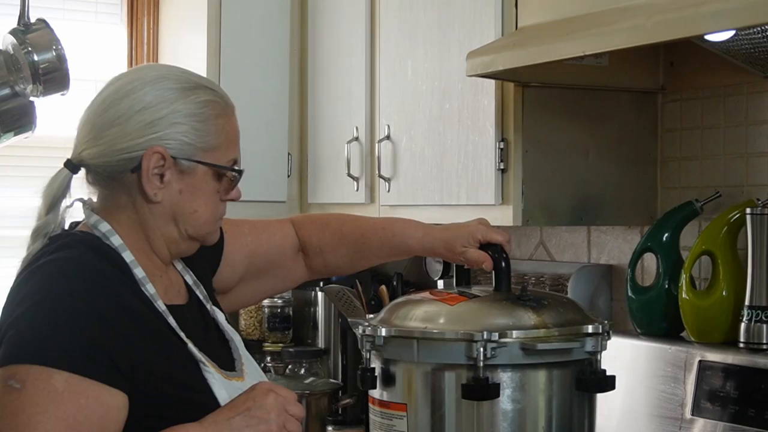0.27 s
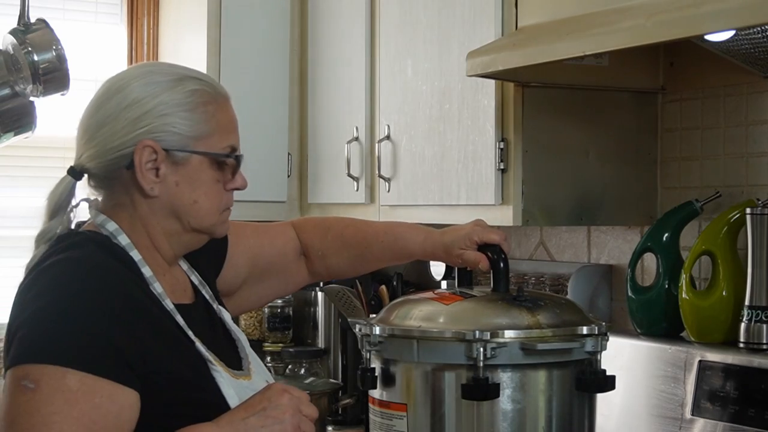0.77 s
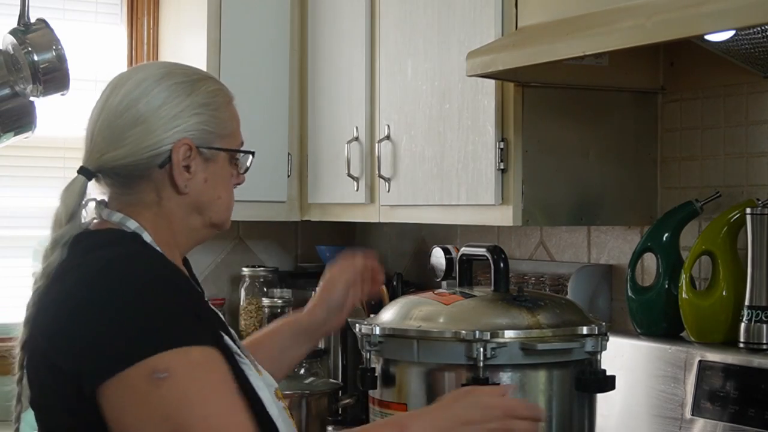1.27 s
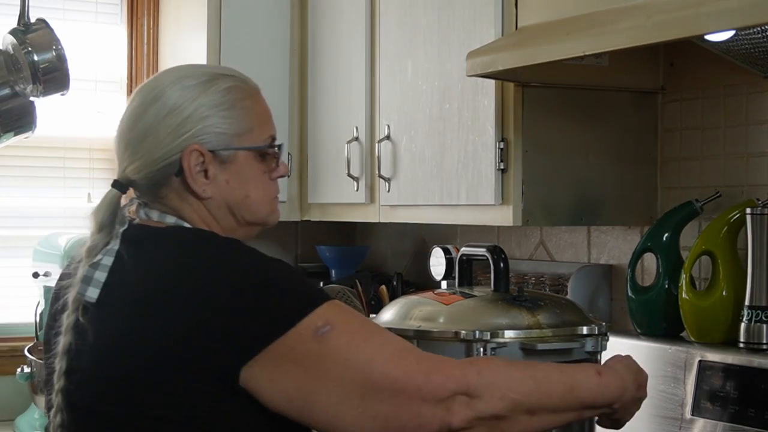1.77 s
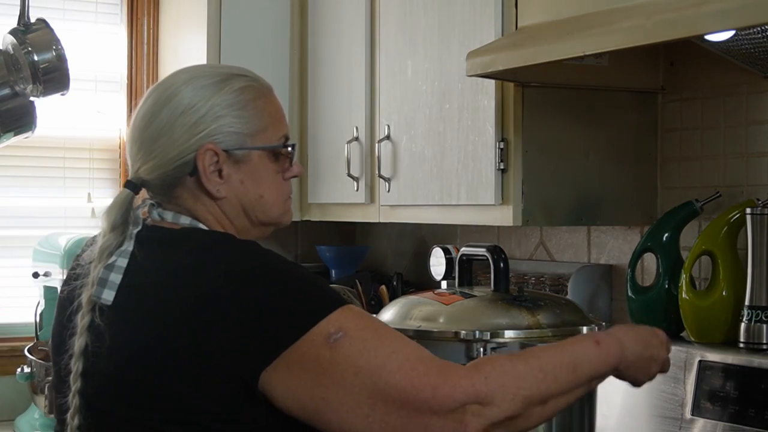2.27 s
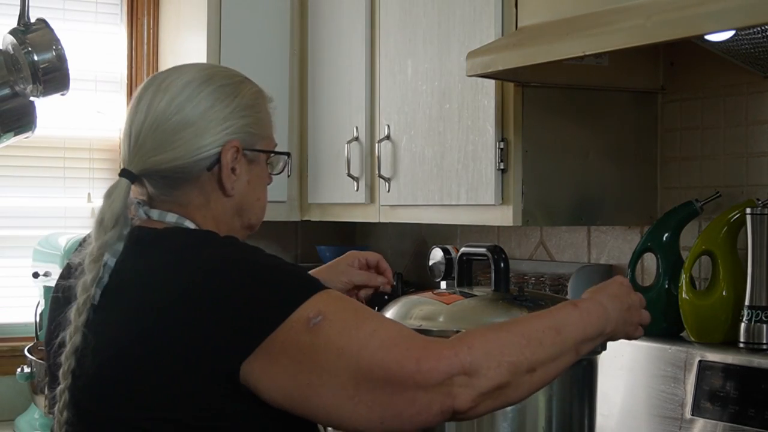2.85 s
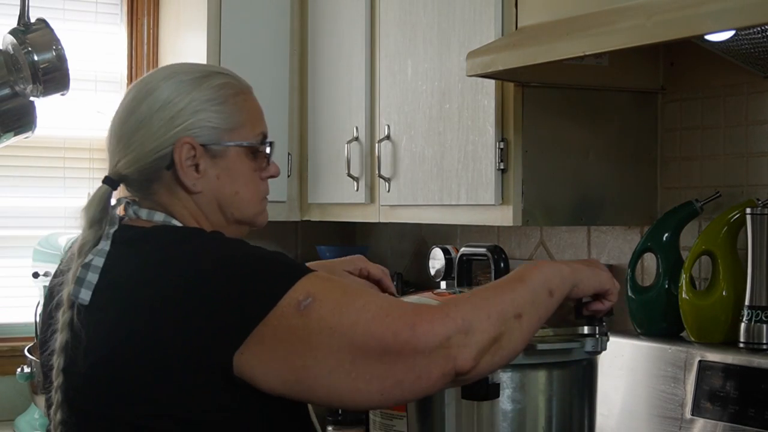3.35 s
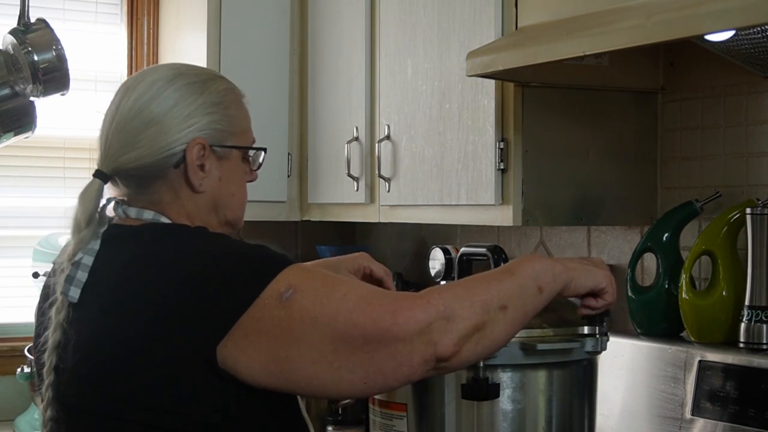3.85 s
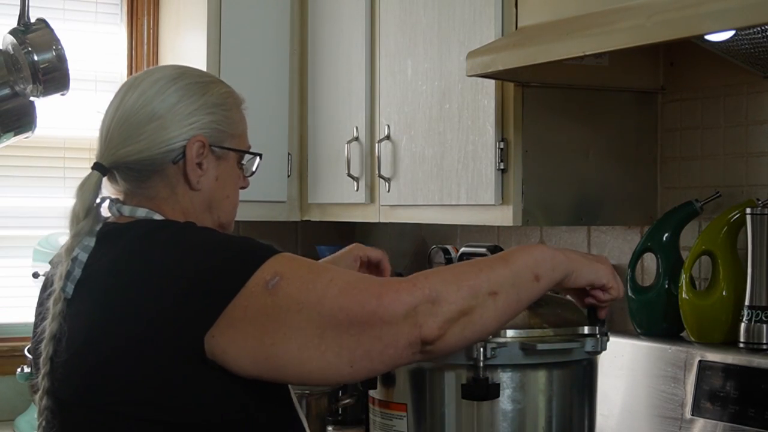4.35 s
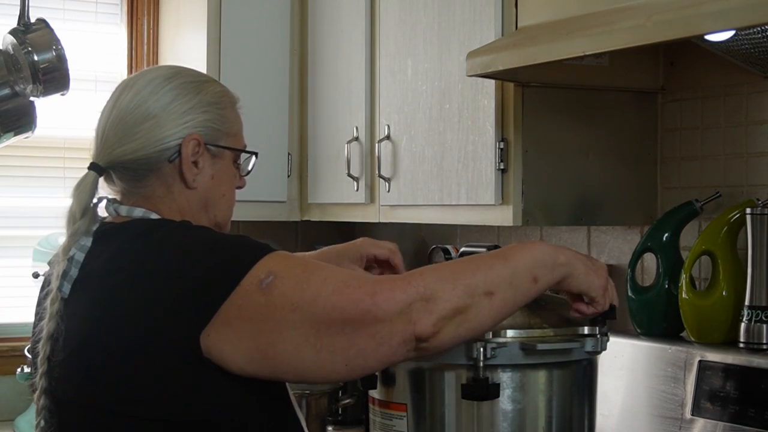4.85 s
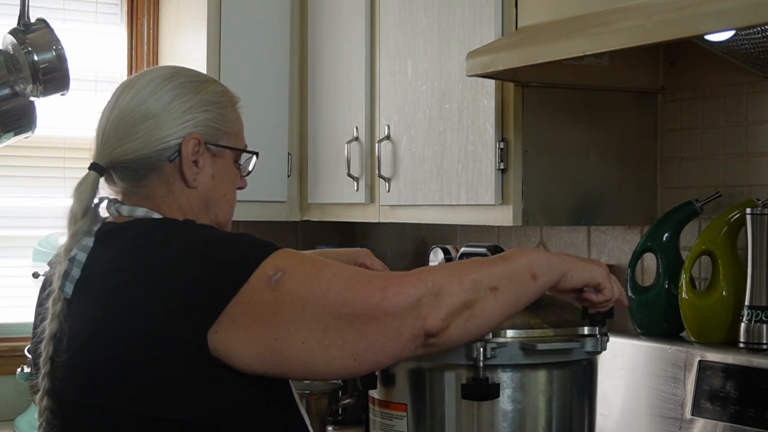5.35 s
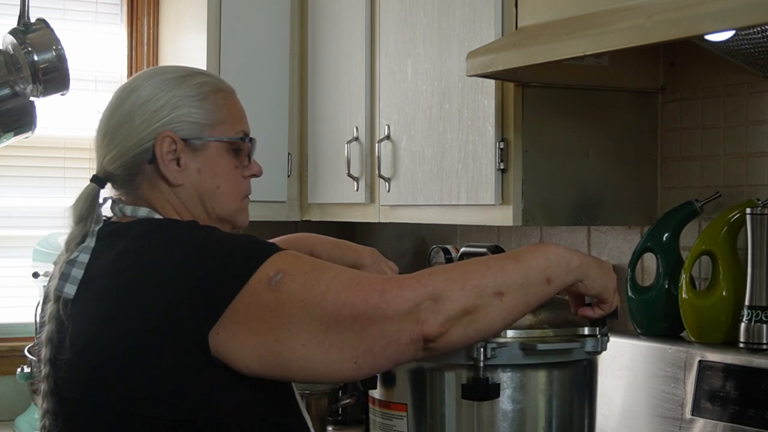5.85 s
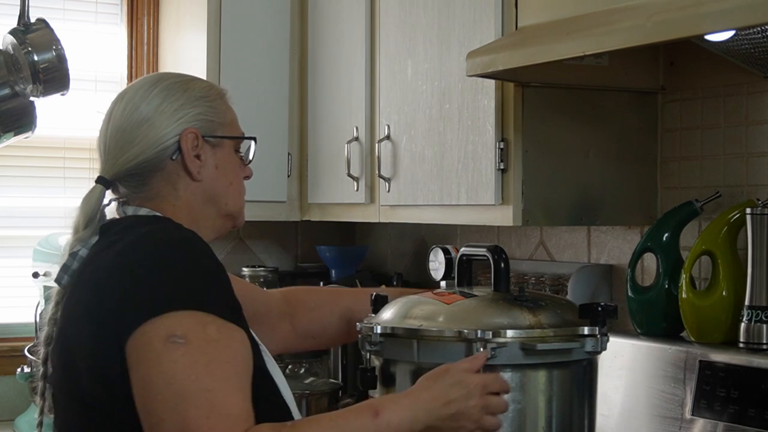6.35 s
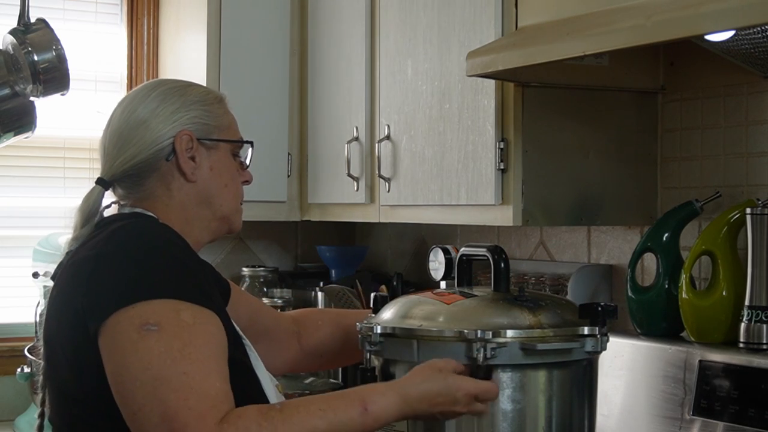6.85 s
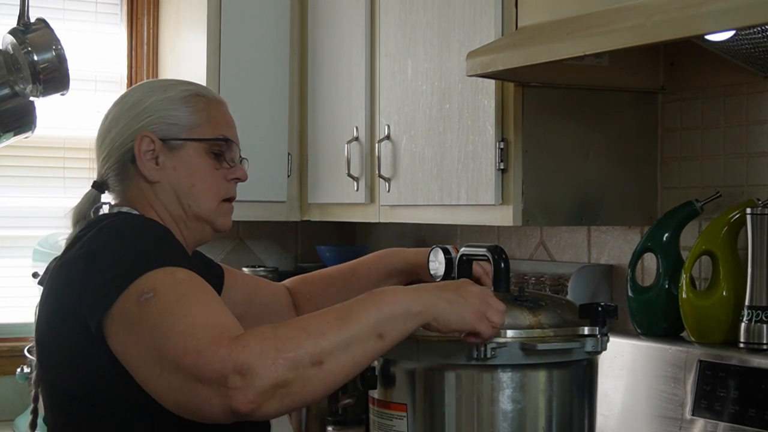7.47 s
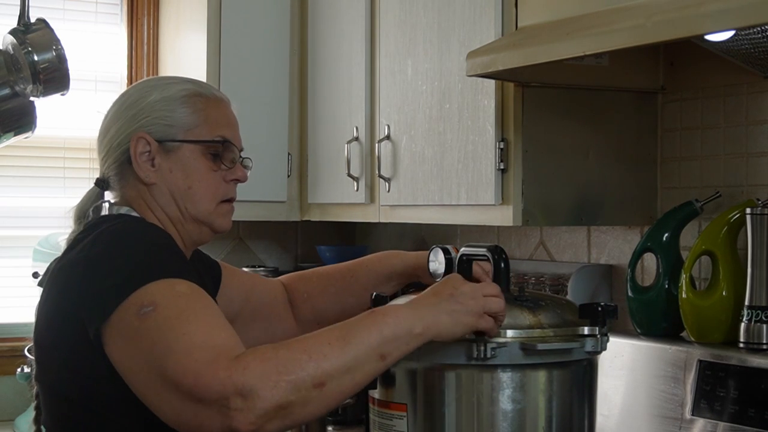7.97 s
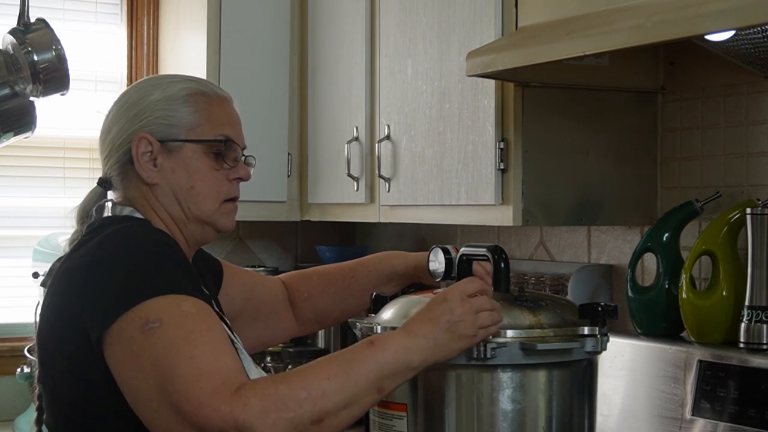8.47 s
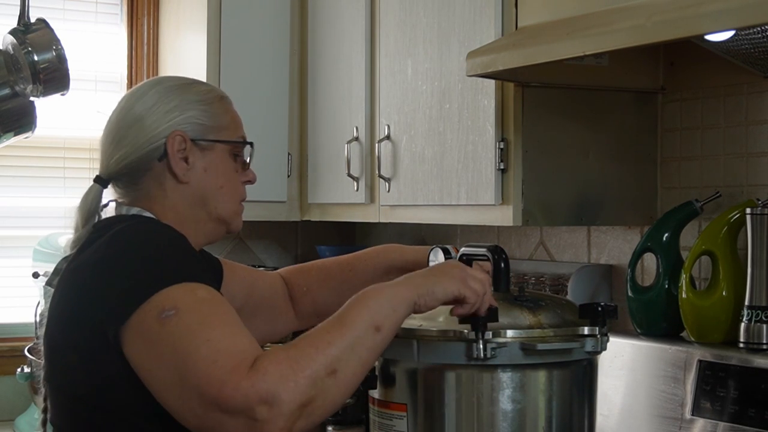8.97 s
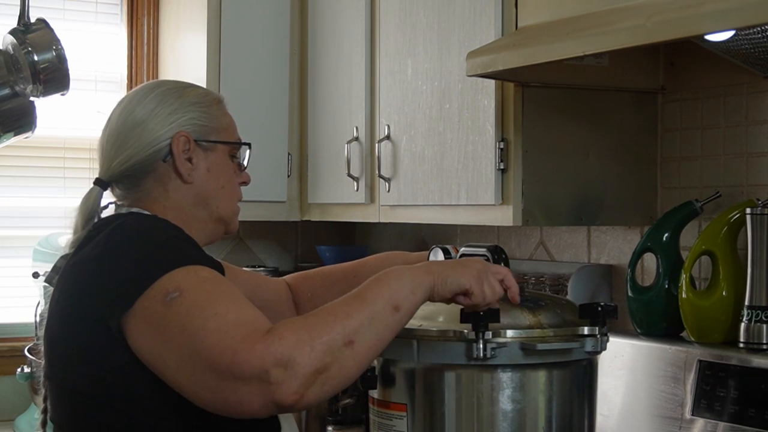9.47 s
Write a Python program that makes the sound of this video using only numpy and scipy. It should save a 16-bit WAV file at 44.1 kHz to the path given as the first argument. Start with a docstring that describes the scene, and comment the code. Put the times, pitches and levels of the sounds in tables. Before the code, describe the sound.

In a small bright kitchen with a low, slowly pulsing hum and soft fan rush, a heavy aluminium lid rubs with a brief singing tone and knocks into place on a large pot. After a pause, clamp bolts rattle and clink, one striking loudly against the rim, then taper off. Another gap, then hard plastic knobs clack and tick irregularly. Close microphone, short room reflections.

```python
"""Throughout, a soft fan rush and two motor hums that beat once a second lie under a small bright kitchen.
First a heavy aluminium lid rubs on a large pressure pot, two modes singing, and knocks into place.
Clamp bolts then swing up against its rim: noisy contacts that also ring the seated lid's modes.
Last, hard plastic knobs clack and click as they are turned: sharp cracks over short, damped modes."""
import sys
import numpy as np
from scipy.fft import rfft, irfft, next_fast_len
from scipy.io import wavfile
from scipy.ndimage import uniform_filter1d

SR = 44100
rng = np.random.default_rng(int(sys.argv[2]) if len(sys.argv) > 2 else 0)


def persist_wave(psi):
    """Save psi, clipped to +-1, as 16-bit WAV."""
    counts = np.round(np.clip(psi, -1, 1) * 32767).astype(np.int16)
    wavfile.write(sys.argv[1], SR, np.atleast_2d(counts).T)


N = 428652
HIT = 2 ** 15  # samples per blow
T = np.arange(HIT) / SR
HZ = np.fft.rfftfreq(HIT, 1 / SR)


def amp(db):
    """Decibels to gain."""
    return 10 ** (np.asarray(db) / 20)


def unit(x):
    """Scale to rms 1."""
    return x / np.sqrt(np.mean(x ** 2) + 1e-20)


def along(points, hz):
    """Interpolate (Hz, value) points on a log frequency axis."""
    f, v = np.transpose(points)
    return np.interp(np.log(hz + 1), np.log(f + 1), v)


def bumps(peaks, hz):
    """Summed lift in dB of broad resonances (Hz, width Hz, lift dB)."""
    return sum(db / (1 + (2 * (hz - centre) / width) ** 2) for centre, width, db in peaks)


def fade(t60_s):
    """Exponential decay over one hit: 60 dB in t60_s."""
    return np.exp(-np.log(1000) * T / t60_s)


def wander(size, step):
    """Random curve, straight between normal knots one step of points apart."""
    knots = rng.standard_normal(int(size / step) + 4)
    return np.interp(np.arange(size) / step, np.arange(len(knots)), knots)


def causal(gain):
    """Minimum-phase response with this gain, by folding the cepstrum."""
    cepstrum = irfft(np.log(np.maximum(gain, 1e-6)))
    cepstrum[1:HIT // 2] *= 2
    cepstrum[HIT // 2 + 1:] = 0
    return np.exp(rfft(cepstrum))


def add(track, time_s, sound):
    """Mix a sound into the track at a time."""
    start = max(round(time_s * SR), 0)
    part = sound[:, :N - start]
    track[:, start:start + part.shape[1]] += part


# steady air: (frequency [Hz], relative density [dB])
AIR_SPECTRUM = [(15, -28.5), (25, -18), (64, -4), (269, -6.5), (473, -6.5), (587, -12), (1250, -19.5),
                (1550, -19), (2260, -23.5), (3580, -27), (4690, -24), (5230, -30.5), (5670, -28.5),
                (7220, -33.5), (15800, -41.5)]
# duct resonances: (frequency [Hz], width [Hz], lift [dB])
DUCT_PEAKS = [(105, 15, 6), (399, 81, 1.5), (1555, 73, 7), (2970, 350, 5.5), (4770, 1200, 5.5),
              (5750, 110, 10.5)]
# stereo spread of the air: (frequency [Hz], side re mid gain [dB])
AIR_SPREAD = [(60, -32), (110, -20), (200, -10), (380, -14), (700, -8), (1290, -7.5), (2380, -4),
              (4400, -6.5), (8120, -1.5), (15000, 0)]


def fan_rush():
    """Air noise shaped by a few duct resonances, as mid and side."""
    size = next_fast_len(N)
    hz = np.fft.rfftfreq(size, 1 / SR)
    gain = amp(along(AIR_SPECTRUM, hz) + bumps(DUCT_PEAKS, hz))
    spread = [np.ones_like(hz), amp(along(AIR_SPREAD, hz))]
    noise = rfft(rng.standard_normal((2, size)))
    mid, side = irfft(noise * gain * spread, size)[:, :N]
    return amp(-54) * np.array([mid, side]) / np.std(mid)


def motor(hz, orders):
    """Motor hum as a harmonic series; orders above the first drift a little in phase."""
    t = np.arange(N) / SR - 1.28  # zero: both fundamentals in step
    drift_rad = 0.15 * wander(N, SR / 3)
    hum = np.zeros(N)
    for order, level_db in orders:
        phase = 2 * np.pi * round(order) * hz * t
        if order > 1.5:
            phase = phase + order * drift_rad + 2 * np.pi * rng.random()
        hum += np.sqrt(2) * amp(level_db) * np.cos(phase)
    return hum


# motor harmonics: (order [multiple of rotation rate], rms level [dB])
FAN_HARMONICS = [(1, -61.5), (2, -64), (3, -66), (4, -68), (5, -73.5), (6, -68.5), (8, -68), (12, -74)]
COMPRESSOR_HARMONICS = [(1, -57), (2, -62), (3, -72.5)]
FAN_HZ, COMPRESSOR_HZ = 57.85, 58.86


def kitchen():
    """Fan rush, plus fan and compressor hums whose 1 Hz offset makes them beat."""
    hum = motor(FAN_HZ, FAN_HARMONICS) + motor(COMPRESSOR_HZ, COMPRESSOR_HARMONICS)
    return fan_rush() + np.outer([1, 0], hum)


# treble tilt: (frequency [Hz], gain per hardness [dB/dB])
HARDNESS_TILT = [(1500, -0.16), (3000, 0), (5400, 0.4945), (7700, 1), (16000, 1.51)]
# bass fill: (frequency [Hz], gain per weight [dB/dB])
WEIGHT_FILL = [(700, 1), (1500, 0)]


def blow(spectrum, level_db, hardness_db, weight_db):
    """Blow spectrum in dB: a shorter, harder contact tilts to treble, the mass behind it fills the bass."""
    bass = np.clip(along(WEIGHT_FILL, HZ), 0, 1)
    tilt_db = hardness_db * along(HARDNESS_TILT, HZ) * (1 - bass)
    return level_db + along(spectrum, HZ) + tilt_db + weight_db * bass


# crowded small modes of the metal: (frequency [Hz], unevenness [dB])
MODE_CROWD = [(300, 1.5), (1500, 3), (4000, 1.5), (12000, 6.5)]
CROWD_SPACING_HZ = 44.84
# stereo spread of blows, wider in the treble: (frequency [Hz], side re mid gain [dB])
BLOW_SPREAD = [(60, -30), (250, -26), (700, -18), (1400, -13), (2800, -12), (5600, -7), (11000, -5)]


def contact(colour_db, crack, chatter_t60_s, room_db, room_t60_s, rough_db, attack_s):
    """Hard contact, mid and side: crack and chatter wake a fresh mix of small modes; the kitchen answers."""
    # tiny rebounds make the chatter lumpy
    rebounds = unit(amp(rough_db * np.clip(wander(HIT, SR / 900), -2, 2)))
    chatter = rng.standard_normal((2, HIT)) * rebounds * fade(chatter_t60_s) * [[1], [.7]]
    room = rng.standard_normal((2, HIT)) * fade(room_t60_s)
    force = (chatter + amp(room_db) * room) * (1 - np.exp(-T / attack_s))
    force[0, round(.003 * SR)] += crack
    crowd = amp(along(MODE_CROWD, HZ) * wander(len(HZ), CROWD_SPACING_HZ / HZ[1]))
    crowd = crowd / np.sqrt(uniform_filter1d(crowd ** 2, size=300))
    response = causal(amp(colour_db) * crowd)
    spread = [np.ones_like(HZ), amp(along(BLOW_SPREAD, HZ))]
    return irfft(rfft(force) * response * spread)


def ring(modes, low_db, high_db, hardness_db, waver):
    """Modes split at 2 kHz: a soft blow misses the highest; reflections build up and make each waver."""
    out = np.zeros((2, HIT))
    build_up = 1 - np.exp(-T / 0.017)
    for hz, mode_db, t60_s in modes:
        echoes = waver * build_up * (wander(HIT, SR / 90) + 1j * wander(HIT, SR / 90))
        carrier = np.exp(2j * np.pi * (hz * T + rng.random()))
        tone = (1 + echoes) * carrier * fade(t60_s)
        blow_db = low_db if hz < 2000 else high_db
        blow_db = blow_db + hardness_db * max(along(HARDNESS_TILT, hz), 0)
        side = amp(along(BLOW_SPREAD, hz)) * tone.imag
        out += amp(mode_db + blow_db) * np.array([tone.real, side])
    return out * (1 - np.exp(-T / 0.0043))


# singing of the sliding lid: (time [s], low mode level [dB], high mode level [dB])
RUB_CURVES = [(0.0, -47, -38), (0.02, -49, -45.5), (0.08, -31.5, -52), (0.106, -33, -50), (0.12, -34, -32),
              (0.18, -26.5, -32)]
# singing modes: (frequency [Hz], level offset [dB])
SINGING_MODES = [(494, -1.5), (1345, 4.5)]
RUB_RELEASE_DB_PER_S = 108


def rub():
    """The lid slides on the rim: two modes sing, then die away as it knocks."""
    t = np.arange(N) / SR
    times_s, *curves_db = np.transpose(RUB_CURVES)
    release_db = RUB_RELEASE_DB_PER_S * np.maximum(t - times_s[-1], 0)
    song = np.zeros(N)
    for (hz, mode_db), curve_db in zip(SINGING_MODES, curves_db):
        level_db = mode_db + np.interp(t, times_s, curve_db) - release_db
        song += amp(level_db) * np.sin(2 * np.pi * hz * t)
    return np.outer([1, 0], song)


# lid knocks: (time [s], level [dB], hardness [dB], weight [dB])
LID_KNOCKS = [(.001, -36.5, -1.5, 4), (0.1039, -18, 2, -3.5), (.183, -13, 4, -11), (.2025, -18, 7, -3.5),
              (0.2183, -15, -3, -13), (.325, -20.5, -1.5, -10.5), (0.3571, -29.5, -13, 6),
              (.4558, -16.5, -3.5, 1.5), (.476, -27.5, -8, 7)]
# lid blow of middling hardness: (frequency [Hz], level [dB])
LID_SPECTRUM = [(40, -28), (130, 2), (240, 14.5), (700, 14), (1500, 7), (2700, 3.5), (3800, 0.5), (5400, 1),
                (7700, -9.5), (11000, -18), (16000, -33)]
# broad lid resonances: (frequency [Hz], width [Hz], lift [dB])
LID_RESONANCES = [(183, 38, 3.5), (305, 99, -3), (455, 230, 1.5), (710, 140, -1.5), (1180, 190, -3),
                  (1570, 60, 4.5), (2120, 690, -1), (5640, 370, 4.5), (13800, 8100, -5.5)]
# modes of the held lid: (frequency [Hz], level [dB], t60 [s])
HELD_LID_MODES = [(386, -4, .27), (497, -2, .31), (829, -14, .25), (1007, -13, .3), (1346, -3, .38),
                  (1476, -5, .33), (1519, -1, .36), (1954, -15, .45), (2598, 0, .32), (2624, 3, .33),
                  (3063, -16, .45), (3612, -13, .45), (3975, -9, .3), (4328, -11, .35), (4560, -7, .38),
                  (4746, -7, .33), (4969, -11, .4), (5435, -8, .4), (6149, -13, .3), (7989, -19, .3)]


def lid():
    """The lid knocks round the rim until it drops home; weight wakes its low modes."""
    track = np.zeros((2, N))
    for time_s, level, hardness, weight in LID_KNOCKS:
        colour_db = blow(LID_SPECTRUM, level, hardness, weight) + bumps(LID_RESONANCES, HZ)
        knock = contact(colour_db, crack=0.99, chatter_t60_s=0.078, room_db=-7.0,
                        room_t60_s=0.41, rough_db=5.5, attack_s=0.003)
        add(track, time_s, amp(2.0) * knock)
        add(track, time_s, ring(HELD_LID_MODES, low_db=level - 10 + .35 * weight,
                                high_db=level - 13.5, hardness_db=hardness, waver=0.75))
    return track


# bolt contacts: (time [s], level [dB], hardness [dB], weight [dB], pitch [Hz])
BOLT_HITS = [(1.768, -26, 4, -28, 4740), (1.8788, -23.5, -8, -16, 2050), (1.9262, -23, -3, -32, 3500),
             (1.9612, -22, 2.5, -19, 3340), (2.0891, -30, 14.5, -19, 4240), (2.1153, -22.5, 0.5, -17, 3400),
             (2.2124, -29.5, 14.5, -19, 4200), (2.361, -30.5, 0, -30, 4300), (2.4573, -27, 12, -28, 2830),
             (2.5318, -25.5, 1.5, -12, 2640), (2.582, -27.5, 0, -16, 3500), (2.6414, -35, 15, 3.5, 2580),
             (2.6951, -31.5, 13, -5, 4070), (2.8237, -23.5, 14.5, -19, 4300),
             (2.854, -7.5, -0.5, -16.5, 2820), (2.8783, -13, -15.5, -29, 1670),
             (3.102, -25.5, -22, -13, 1700), (3.1089, -20.5, -8, -9.5, 2900),
             (3.2897, -29, 2.5, -11.5, 1960), (3.371, -28, -32, -11, 1760), (3.4082, -26.5, 13, -9, 2640),
             (3.449, -29, -4, 4, 4670), (3.562, -21.5, -2.5, -5.5, 1690), (3.6574, -26, 9, -7.5, 5700),
             (3.78, -17.5, -2, -18.5, 2800), (3.907, -29, 13, -6.5, 4570),
             (3.9425, -25, -19.5, -14.5, 2620), (4.1279, -37, 7.5, -7, 2600),
             (4.2288, -38.5, -2, -10, 4700), (4.2549, -34.5, 2.5, -12, 3870), (4.2775, -34, -12, -20, 1960),
             (4.3357, -36, 10, -21, 1610), (4.4157, -28.5, 1, -14, 1910), (4.434, -30, 12.5, -15, 4660),
             (4.473, -33, -12, -11.5, 1880), (4.6323, -29.5, 13, -10.5, 1790),
             (4.7965, -40.5, -16, -17, 1570), (4.839, -38, 11, 0, 1190), (4.9005, -37, 11, -6.5, 1410),
             (5.032, -44, 7.5, -8, 3880)]
# bolt blow of middling hardness: (frequency [Hz], level [dB])
BOLT_SPECTRUM = [(40, -15), (130, -1.5), (240, 7.5), (700, 13), (1500, -1.5), (2700, -0.5), (3800, 1),
                 (5400, -2.5), (7700, -14.5), (11000, -27), (16000, -37)]
# broad bolt resonances: (frequency [Hz], width [Hz], lift [dB])
BOLT_RESONANCES = [(414, 86, 5), (597, 140, -1.5), (844, 190, -7), (1940, 170, 1), (3500, 80, 1),
                   (4495, 145, 4.5), (6640, 1100, 1), (13640, 7400, -7)]
# modes of the lid seated on the pot: (frequency [Hz], level [dB], t60 [s])
SEATED_LID_MODES = [(382, -17, .4), (1125, -22, .4), (1448, -11, .28), (1702, -1, .37), (1976, -16, .35),
                    (2621, 0, .32), (3056, -15, .4), (3246, -9, .27), (3618, -12, .33), (3736, -14, .25),
                    (4332, -17, .37), (4813, -17, .25), (5450, -23, .4), (6595, -25, .3), (7989, -30, .3),
                    (9109, -31, .2)]
# before the rim, bolts only rattle on their pivots and the lid rings less
RIM_REACHED_S, PIVOT_RING_DB = 2.8, -8
LID_WAKE_DB_PER_DB, HARD_TAP_LOSS_DB_PER_DB = 1.33, .22  # per level, per hardness


def bolts():
    """Steel bolts swing into their slots, each with its own dull pitch, and ring the seated lid."""
    track = np.zeros((2, N))
    for time_s, level, hardness, weight, hz in BOLT_HITS:
        # a stronger blow reaches higher into the treble
        top_db = 0.83 * max(level + 23, 0)
        # a softer one gathers round its own pitch
        gather_db = 3.26 + 0.14 * max(-hardness, 0)
        own_peaks = [(hz, 0.22 * hz, 3), (hz, 0.95 * hz, gather_db), (10400, 700, 3), (12000, 7000, top_db)]
        colour_db = blow(BOLT_SPECTRUM, level, hardness, weight)
        colour_db = colour_db + bumps(BOLT_RESONANCES, HZ) + bumps(own_peaks, HZ)
        add(track, time_s, contact(colour_db, crack=1.5, chatter_t60_s=0.055, room_db=-6.5,
                                   room_t60_s=0.39, rough_db=2.0, attack_s=0.0021))
        # a light, hard tap hardly wakes the heavy lid
        wake_db = LID_WAKE_DB_PER_DB * level - HARD_TAP_LOSS_DB_PER_DB * hardness
        if time_s < RIM_REACHED_S:
            wake_db += PIVOT_RING_DB
        add(track, time_s, ring(SEATED_LID_MODES, low_db=1.2 * wake_db - 7.5, high_db=wake_db - 4,
                                hardness_db=hardness, waver=0.75))
    return track


# knob blow of middling hardness: (frequency [Hz], level [dB])
KNOB_SPECTRUM = [(40, -40), (130, -20), (240, -7.5), (700, -12), (1500, -6.5), (2700, -1), (3800, 0),
                 (5400, -3.5), (7700, -11), (11000, -25), (16000, -28)]
# broad knob resonances: (frequency [Hz], width [Hz], lift [dB])
KNOB_RESONANCES = [(1060, 1800, -3), (1620, 57, 5), (2180, 1200, -2.5), (2557, 520, 2), (3750, 730, 0),
                   (4420, 420, 3.5), (8800, 3500, -3.5), (10300, 580, -0.5), (13900, 5500, -14.5)]
# modes of a knob on its bolt: (frequency [Hz], level [dB], t60 [s])
KNOB_RING_MODES = [(1420, -18, 0.47), (1502, -7, 0.17), (1934, -4.5, 0.35), (2020, -24, 0.63),
                   (2655, -10, 0.32), (2930, 2.5, 0.17), (3340, 0.5, 0.1), (3810, 2, 0.17),
                   (3840, 10, 0.028), (4190, 3, 0.19), (4770, -10.5, 0.18), (10250, -26, 0.21)]


def knob(level, hardness, hz):
    """Hard plastic clacks and rings briefly; the grip leaves one damped resonance strongest."""
    # a stronger blow reaches the topmost resonances
    top_db = 1.26 * max(level + 26, 0)
    own_peaks = [(hz, 0.073 * hz, 5), (hz, 0.8 * hz, 1.5), (10500, 700, top_db), (14000, 2500, top_db)]
    # the thud of the hand grows more slowly than the click
    thud_db = -.45 * (level + 26.5)
    colour_db = blow(KNOB_SPECTRUM, level, hardness, thud_db)
    colour_db = colour_db + bumps(KNOB_RESONANCES, HZ) + bumps(own_peaks, HZ)
    clack = contact(colour_db, crack=3.4 * amp(0.17 * (level + 16)), chatter_t60_s=0.046, room_db=-10,
                    room_t60_s=0.45, rough_db=3, attack_s=0.0022)
    tail = ring(KNOB_RING_MODES, low_db=level - 27.5 - 0.37 * hardness, high_db=level - 21,
                hardness_db=hardness, waver=0.95)
    return amp(3) * clack + tail


# knob clacks: (time [s], level [dB], hardness [dB], pitch [Hz])
KNOB_HITS = [(6.4373, -11, -5.5, 3800), (6.4859, -9, -12, 2970), (6.647, -22.5, -2, 4130),
             (6.7287, -42.5, 11, 4300), (6.765, -42.5, 6, 4400), (6.9219, -34.5, -4, 3890),
             (6.978, -35, 12.5, 4370), (7.2296, -20, -23, 2760), (7.2608, -25, -2, 4500),
             (7.2854, -22.5, -8, 1900), (7.4338, -39, 5, 2840), (7.656, -42, -2, 4260),
             (7.6856, -38.5, -15, 2920), (7.779, -27, 6.5, 4440), (8.362, -37.5, -3, 3140),
             (8.4002, -26.5, 5.5, 4550), (8.41, -21.5, 0.5, 4000), (8.6107, -34.5, -3.5, 3800),
             (8.7207, -19, -14, 2920), (8.8199, -39, 8, 2910), (8.8361, -30, 10.5, 4200),
             (8.8854, -33, 7, 4300), (8.9825, -25.5, 1, 4130), (8.9953, -23.5, 1, 4360),
             (9.1862, -25.5, -5, 3570), (9.436, -34.5, -7, 3600)]


def knobs():
    """The knobs clack as they are gripped and tick as they turn on their threads."""
    track = np.zeros((2, N))
    for time_s, level, hardness, hz in KNOB_HITS:
        add(track, time_s, knob(level, hardness, hz))
    return track


def scene():
    """All sources, mid and side turned to left and right, left slightly louder."""
    mid, side = kitchen() + rub() + lid() + bolts() + knobs()
    balance_db = [[.15], [-.15]]
    return np.array([mid + side, mid - side]) * amp(balance_db)


TOP_HZ = 15800


def record(dry):
    """Brick-wall low-pass: nothing remains at or above TOP_HZ."""
    size = next_fast_len(N + SR // 2)
    passband = np.fft.rfftfreq(size, 1 / SR) < TOP_HZ
    return irfft(rfft(dry, size) * passband, size)[:, :N]


dry = scene()
out = record(dry)
persist_wave(out)
```